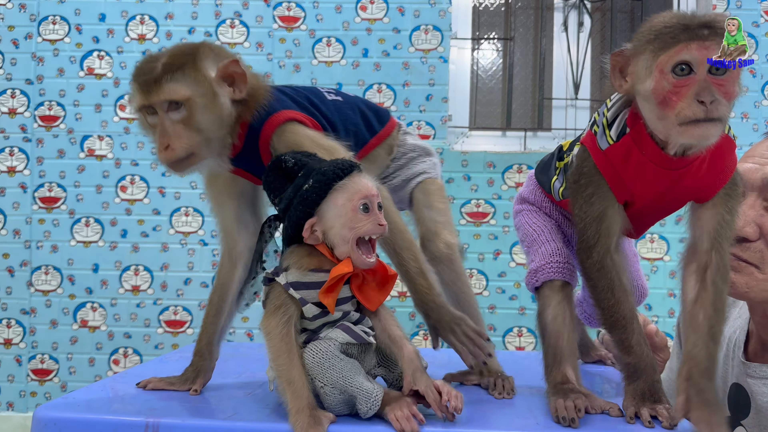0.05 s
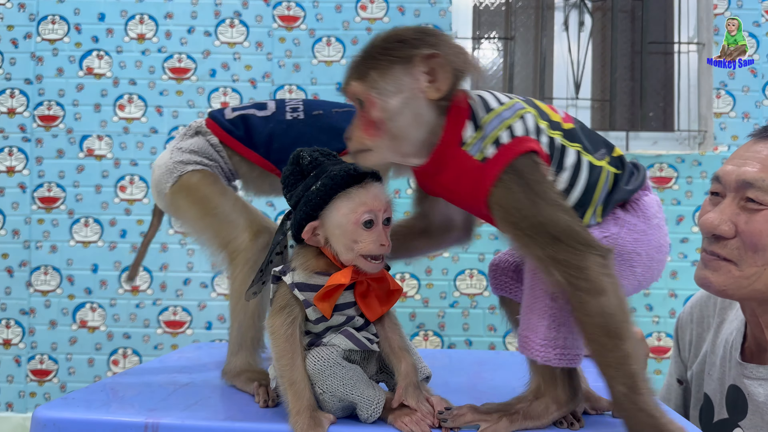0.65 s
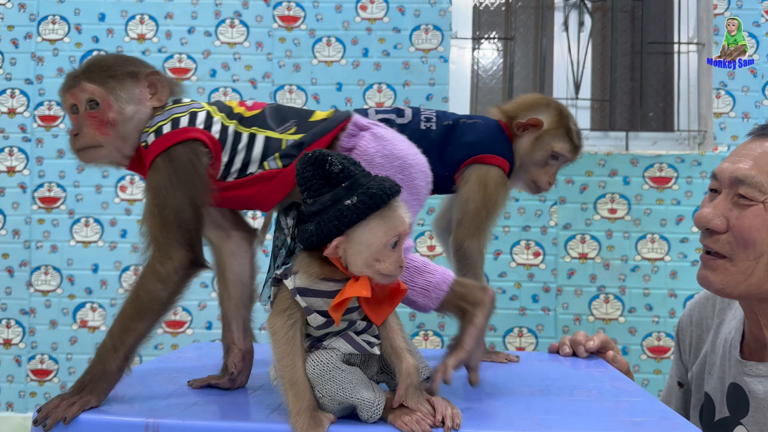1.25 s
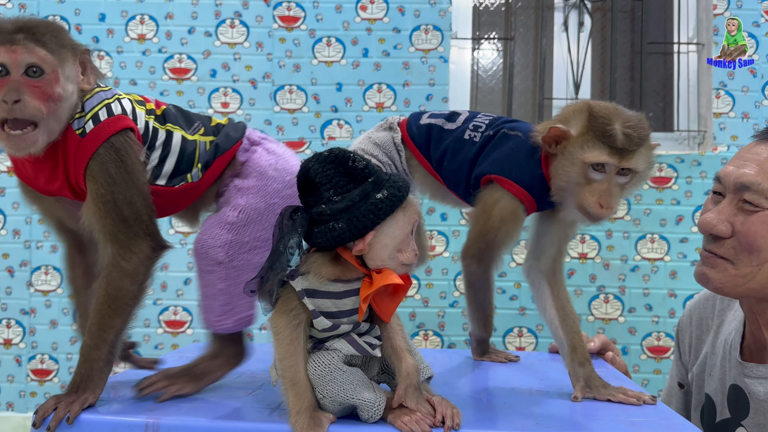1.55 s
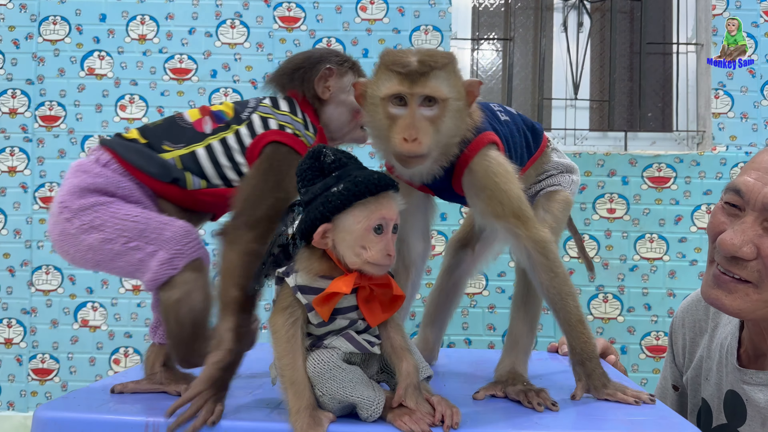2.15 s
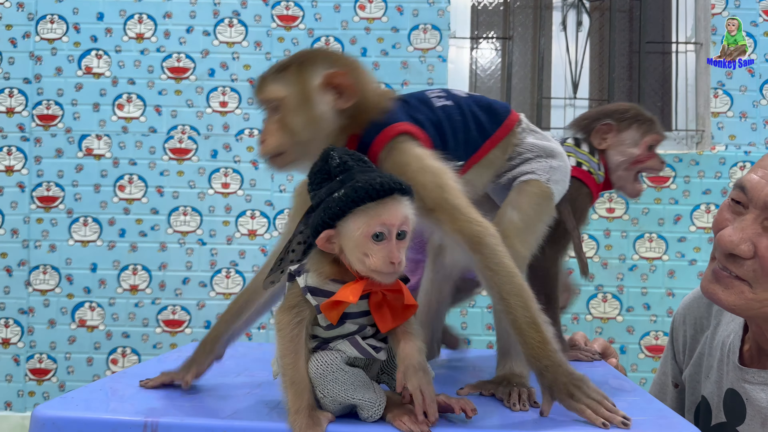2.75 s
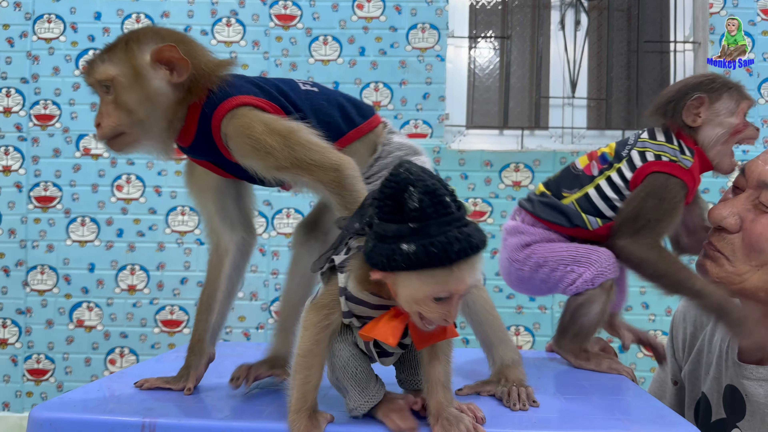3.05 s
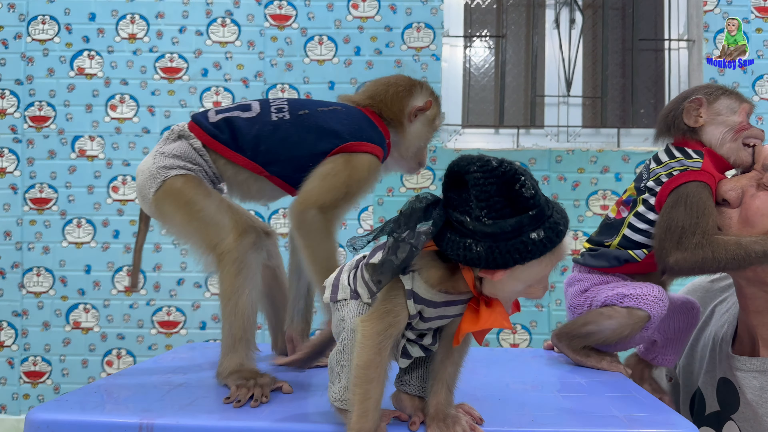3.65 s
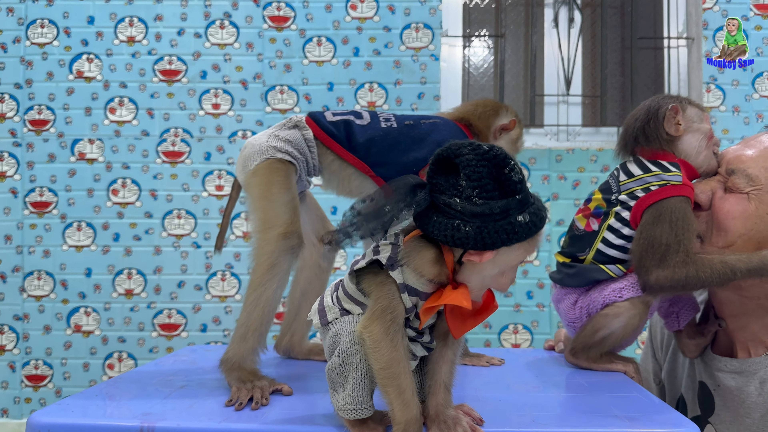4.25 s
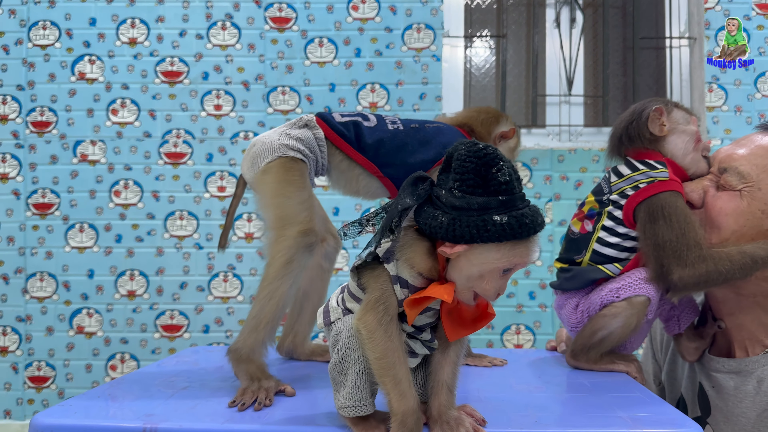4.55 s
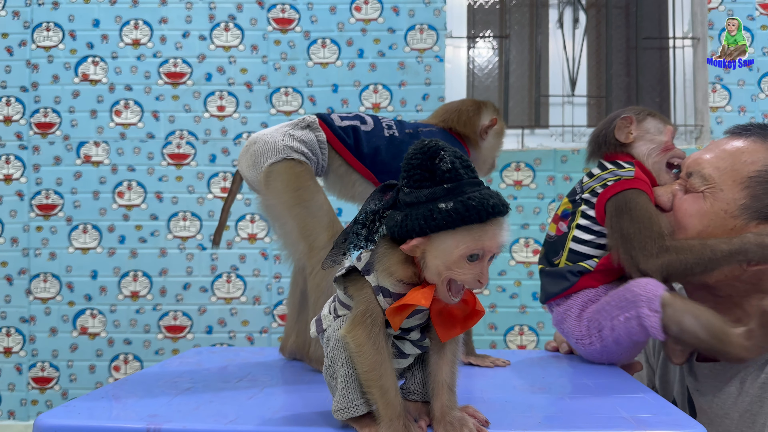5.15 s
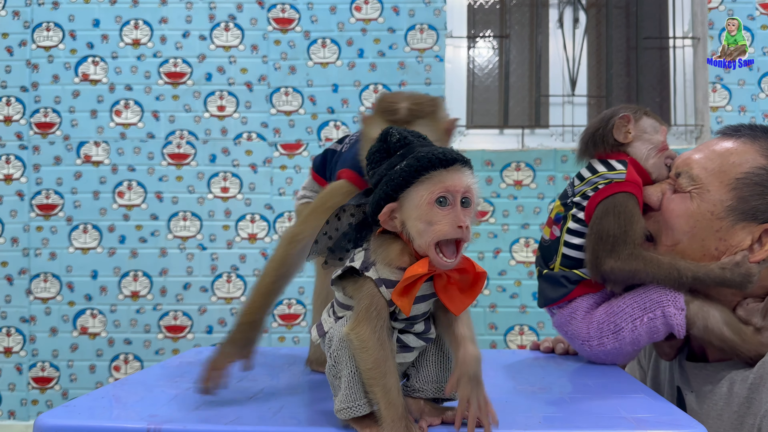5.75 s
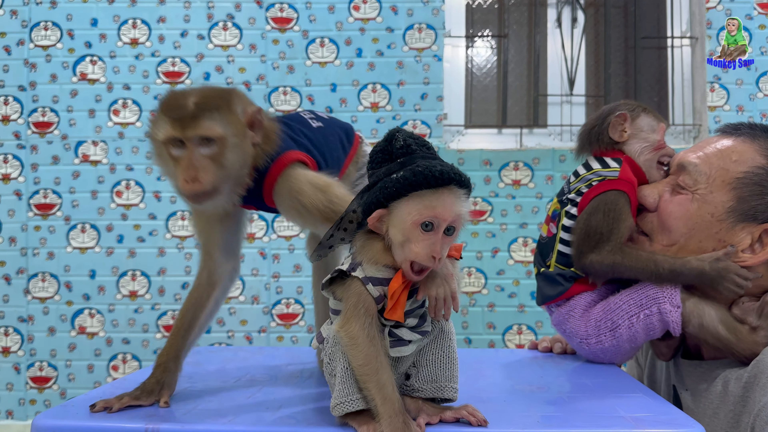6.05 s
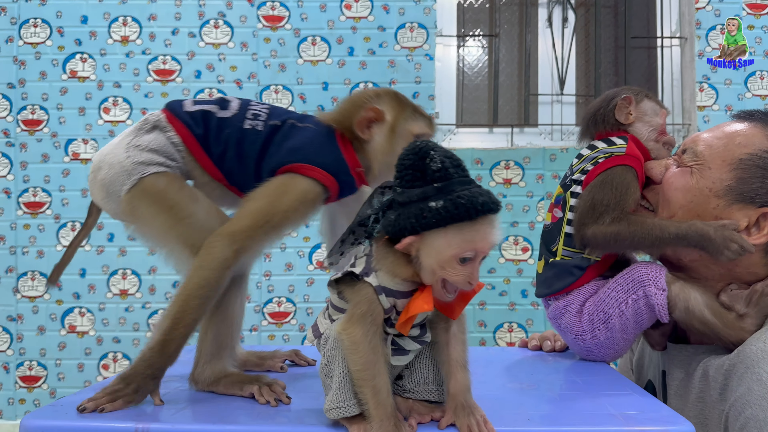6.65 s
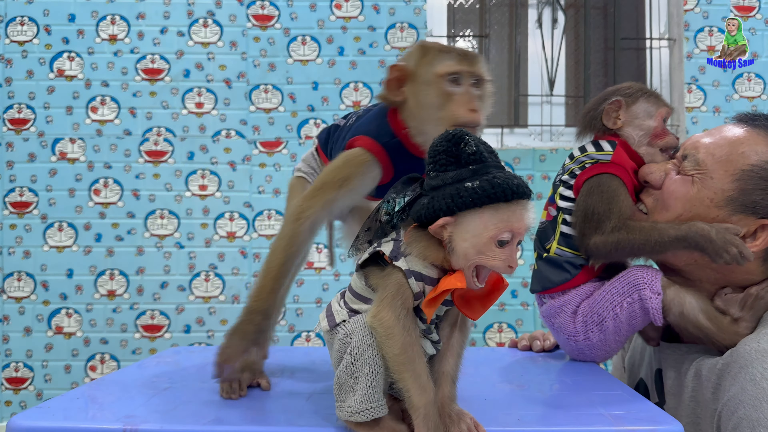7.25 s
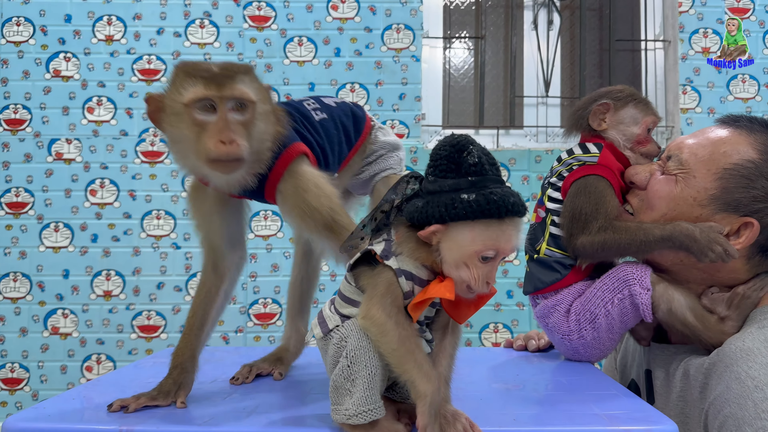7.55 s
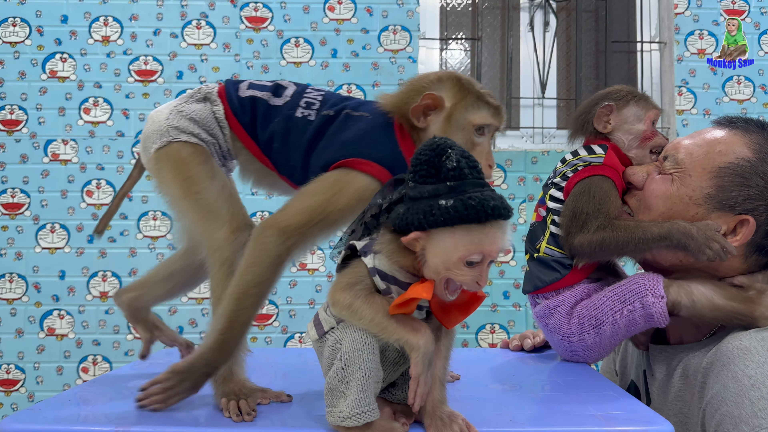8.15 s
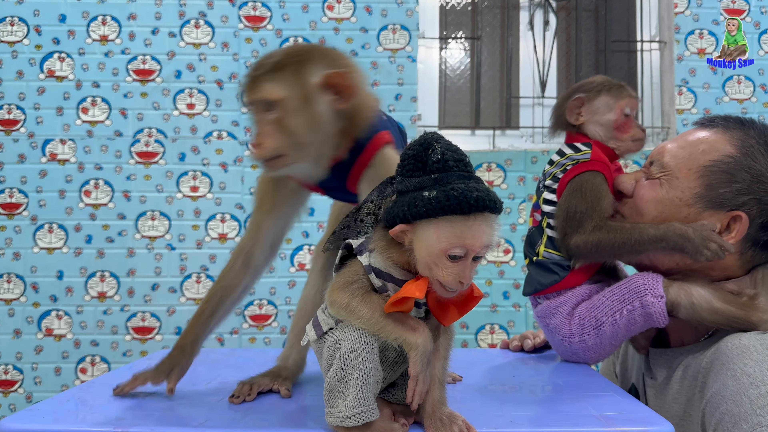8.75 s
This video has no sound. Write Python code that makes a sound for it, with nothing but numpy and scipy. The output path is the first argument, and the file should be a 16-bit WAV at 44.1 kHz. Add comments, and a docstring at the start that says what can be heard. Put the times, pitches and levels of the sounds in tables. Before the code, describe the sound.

A baby monkey screams repeatedly in an echoing room, with thin chirps, soft coos and light thumps over a faint hum.

```python
"""Baby monkey screaming in a tiled room

A baby monkey screams five times: a clear wail rises, breaks into a hoarse shriek as the vocal folds
flap chaotically, and plunges. A sixth wail is just starting at the end. Thin chirps and soft coos
come between. Older monkeys clamber over a plastic table, feet thumping, nails ticking and limbs
scuffing, while a motor hums faintly under the room air."""
import sys
import numpy as np
from scipy import signal
from scipy.fft import rfft, irfft
from scipy.io import wavfile

SR = 44100
rng = np.random.default_rng(int(sys.argv[2]) if len(sys.argv) > 2 else 0)


def master(y):
    """Save y as 16-bit WAV."""
    cut = np.clip(np.atleast_2d(y).T, -1, 1)
    pcm = np.round(cut * 32767)  # scale
    wavfile.write(sys.argv[1], SR, pcm.astype(np.int16))


N = 397341
TIME = np.arange(N) / SR


def amp(db):
    """Decibels to gain."""
    return 10 ** (np.asarray(db) / 20)


def unit(x):
    """Scales to rms 1."""
    return x / np.sqrt(np.mean(x ** 2) + 1e-20)


def curve_at(points, hz):
    """Reads a curve on a log-frequency axis."""
    freqs, values = np.transpose(points)
    return np.interp(np.log(hz + 1), np.log(freqs + 1), values)


def noise(eq):
    """Noise of rms 1, coloured by an EQ curve in dB."""
    gain = amp(curve_at(eq, np.fft.rfftfreq(N, 1 / SR)))
    return unit(irfft(rfft(rng.standard_normal(N)) * gain, N))


def wander(hz):
    """Random motion of rms 1, no faster than about hz."""
    freqs = np.fft.rfftfreq(N, 1 / SR)
    return unit(irfft(rfft(rng.standard_normal(N)) / np.sqrt(1 + (freqs / hz) ** 4), N))


def automation(calls, fade_s=.0077):
    """Joins breakpoints (time_s, pitch_hz, level_db, ...) into curves; gain closes between calls."""
    rows = np.concatenate(calls)
    times, *columns = rows[np.argsort(rows[:, 0])].T
    hz, db, *rest = (np.interp(TIME, times, column) for column in columns)
    gate = sum(np.clip(np.minimum(TIME - call[0][0], call[-1][0] - TIME) / fade_s + .5, 0, 1)
               for call in calls)
    return hz, amp(db) * gate, *rest


def harmonics(hz, levels_db):
    """Harmonics on a moving pitch, each fading out before it leaves the audible range."""
    phase = 2 * np.pi * np.cumsum(hz) / SR
    return np.sqrt(2) * sum(amp(db) * np.clip((SR / 2 - k * hz) / (SR / 20), 0, 1) * np.sin(k * phase)
                            for k, db in enumerate(levels_db, 1))


# Decay of the tiled room: freq_hz, t60_s
ROOM_DECAY = [(150, 0.48), (1000, 1), (3000, 0.77), (6000, 0.42), (10000, 0.48), (15000, 0.38)]
def room(x, wet_db, early_db=-7, shared=.1, echoes_per_s=6000, build_s=.0084):
    """Direct sound, a few wall reflections and a dense tail in which each band dies at its own speed."""
    taps = rng.standard_normal((3, SR)) * (rng.random((3, SR)) < echoes_per_s / SR)
    stereo_taps = np.sqrt(shared) * taps[0] + np.sqrt(1 - shared) * taps[1:]
    hz, age, bands = signal.stft(stereo_taps, SR, nperseg=256)
    decay = amp(-60 * age / curve_at(ROOM_DECAY, hz)[:, None])
    tail = signal.istft(bands * decay * np.clip(age / build_s, 0, 1), SR, nperseg=256)[1]
    response = amp(wet_db) * tail / np.linalg.norm(tail[0])
    for ear in response:
        delays = (rng.uniform(.002, .02, size=6) * SR).astype(int)
        ear[delays] += amp(early_db) / np.sqrt(6) * rng.choice([-1, 1], size=6)
    response[:, 0] += 1  # direct sound
    return signal.fftconvolve(x[None], response / np.linalg.norm(response[0]), axes=1)[:, :N]


# Colour of the room tone: freq_hz, gain_db
AIR_EQ = [(25, -39), (55, -9), (130, -8), (200, -7.5), (330, -11.5), (1350, -15.5), (2240, -19.5),
          (4500, -32), (10000, -39), (15000, -47)]
def room_air(level_db=-47, shared=.18):
    """A wide, gently drifting rush of air."""
    common, left, right = (noise(AIR_EQ) for _ in range(3))
    air = np.sqrt(shared) * common + np.sqrt(1 - shared) * np.array([left, right])
    return air * amp(level_db + 1.2 * wander(1.3))


# Swells of the motor's hum, early and late: time_s, level_db
HUM_RIDE_EARLY = [(0.0, -54), (1.03, -56), (1.94, -44), (2.34, -57), (2.8, -52)]
HUM_RIDE_LATE = [(3.8, -67), (4.64, -60), (5.46, -44), (5.62, -58), (6.71, -42), (7.7, -57), (8.9, -40),
                 (9.0, -44)]
def motor(fast_hz=107, slow_hz=92.6, slowing_s=(2.1, 5.3), whine_hz=312, whine_db=-60, trim_db=1):
    """A drifting hum that drops in pitch once as the motor slows, and a faint whine."""
    times, levels_db = np.concatenate([HUM_RIDE_EARLY, HUM_RIDE_LATE]).T
    hz = np.interp(TIME, slowing_s, [fast_hz, slow_hz])
    gain = amp(trim_db + np.interp(TIME, times, levels_db) + 2.8 * wander(7))
    hum = gain * harmonics(hz * (1 + .02 * wander(15)), [0, -18])
    whine = amp(whine_db + 2.7 * wander(2.5)) * harmonics(whine_hz * (1 + .0025 * wander(4.3)), [0])
    return hum + whine


def bursts(contacts, eq, attack_s):
    """Coloured noise that swells and dies after each contact (start_s, level_db, t60_s)."""
    envelope = np.zeros(N)
    for start, db, t60 in contacts:
        first = int(start * SR)
        age = TIME[:min(SR, N - first)]
        envelope[first:first + SR] += amp(db - 60 * age / t60) * (1 - np.exp(-age / attack_s))
    return envelope * noise(eq)


# Footfalls, nail ticks and light knocks: start_s, level_db
FOOTFALLS = [(2.924, -29), (3.029, -31.5), (3.107, -29), (3.248, -34), (3.328, -35.5), (3.415, -31.5),
             (8.7, -40), (8.87, -38)]
NAIL_TICKS = [(1.5916, -32.5), (1.6053, -30), (1.6243, -20.5), (1.6555, -26.5), (5.062, -30)]
TABLE_KNOCKS = [(4.408, -30), (4.609, -30), (8.706, -34), (8.786, -33)]
# Limbs scuffing: start_s, level_db, t60_s
LIMB_SCUFFS = [(1.173, -47, .7), (1.62, -46, 0.43), (6.4, -36, 1)]
# Colour of each kind of contact: freq_hz, gain_db
FOOTFALL_EQ = [(25, -28.5), (60, -2.5), (110, 0), (290, -13), (600, -36.5), (1300, -76)]
KNOCK_EQ = [(300, -8), (1200, 0), (2200, -4), (5000, -20), (12000, -35)]
SCUFF_EQ = [(300, 6), (700, -0.5), (1250, 12), (1800, -3.5), (4000, -46.5), (12000, -57)]
def clambering(thump_t60_s=.38, tick_t60_s=.032, knock_t60_s=.06):
    """Feet, nails and limbs strike and rub the plastic table."""
    tick_eq = [(500, -2), (3000, -8), (7000, -4), (15000, -7)]
    thumps = bursts([(s, db - 2.5, thump_t60_s) for s, db in FOOTFALLS], FOOTFALL_EQ, attack_s=.002)
    ticks = bursts([(s, db - 5, tick_t60_s) for s, db in NAIL_TICKS], tick_eq, attack_s=.0001)
    knocks = bursts([(s, db - 8, knock_t60_s) for s, db in TABLE_KNOCKS], KNOCK_EQ, attack_s=.0004)
    return thumps + ticks + knocks + bursts(LIMB_SCUFFS, SCUFF_EQ, attack_s=.004)


# Soft hoots and squeaks: start_s, end_s, start_hz, end_hz, level_db, octave_db
HOOTS = [(1.173, 1.27, 1350, 1240, -49, -22), (1.531, 1.62, 1682, 1960, -44.5, -16),
         (1.648, 1.675, 3015, 3420, -44.5, -20), (2.14, 2.238, 770, 860, -50, 4.5),
         (2.239, 2.52, 517, 384, -42.5, -4)]
# Low throat groans around the screams' plunges: start_s, end_s, level_db
THROAT_GROANS = [(.49, .55, -49), (3.556, 3.598, -39), (5.58, 5.63, -44), (5.675, 5.707, -40),
                 (7.22, 7.256, -41), (8.508, 8.575, -42)]
def coos(groan_hz=(720, 455), groan_octave_db=-9, first_half_glide=.7):
    """Soft hoots and groans with few overtones; the higher they are, the more they crack."""
    groans = [(start, end, *groan_hz, db, groan_octave_db) for start, end, db in THROAT_GROANS]
    calls = [[(start, first_hz, db - 5.5, octave),
              ((start + end) / 2, first_hz + first_half_glide * (last_hz - first_hz), db, octave),
              (end, last_hz, db - 1, octave)]
             for start, end, first_hz, last_hz, db, octave in HOOTS + groans]
    hz, gain, octave_db = automation(calls, fade_s=.0052)
    jitter = np.interp(hz, [600, 1500], [.013, .042])
    return gain * harmonics(hz * (1 + jitter * wander(130)), [0, octave_db, -24, -22])


# One long sagging whistle: time_s, pitch_hz, level_db
LONG_WHISTLE = [(2.309, 5300, -41), (2.38, 6470, -36), (2.458, 5458, -31), (2.612, 5230, -28),
                (2.639, 4420, -33.5)]
# Short chirps: start_s, flick_s, held_hz, lift_ratio, held_db, flick_db, rasp_db
CHIRP_CALLS = [(1.744, 1.85, 6157, .02, -24, -32, -26), (2.775, 2.827, 5430, .15, -23, -32, -9.5),
               (2.966, 3.013, 5850, .17, -26.5, -22, -5), (3.345, 3.386, 5745, .24, -27, -23.5, -5),
               (3.673, 3.712, 5460, .2, -20, -18.5, -9), (3.85, 3.9, 6595, .1, -24.5, -24, -7),
               (4.04, 4.089, 5820, .2, -26, -23, -8), (4.249, 4.295, 5570, .19, -24.5, -21, -11),
               (4.465, 4.507, 6450, .02, -27.5, -24, -14), (6.055, 6.171, 5500, .19, -22, -11, -20),
               (6.265, 6.283, 5250, .19, -27, -16.5, -12), (6.392, 6.405, 4980, .21, -37, -15.5, -15.5),
               (6.543, 6.567, 5900, .07, -22.5, -31, -16), (7.615, 7.635, 6400, .05, -51, -55, -10)]
def chirps(fall_s=.018, jitter=.003, flick_jitter=.042, warble=.017, octave_db=-10, onset_db=-8):
    """Thin, breathy, warbling whistles; the short ones lift, settle, flick up raggedly and drop fast."""
    calls = [[(*row, jitter, -5.5, octave_db) for row in LONG_WHISTLE]]  # rasp 5.5 dB under the tone
    for start, flick, held_hz, lift, held_db, flick_db, rasp_db in CHIRP_CALLS:
        top_hz, length = held_hz * (1 + lift), flick - start
        end_hz = top_hz * (.67 - .01 * (flick_db + 24))  # louder flicks drop deeper
        hold = [(start, held_hz, held_db + onset_db),
                (start + .13 * length, top_hz, held_db + onset_db / 3),
                (start + .28 * length, held_hz, held_db),
                (flick - .005, held_hz, held_db)]
        drop = [(flick, top_hz, flick_db - 7),
                (flick + fall_s / 2, (top_hz + end_hz) / 2, flick_db),
                (flick + fall_s, end_hz, flick_db)]
        calls.append([(*row, jitter, rasp_db, octave_db) for row in hold]
                     + [(*row, flick_jitter, rasp_db - 16, octave_db - 9) for row in drop])
    hz, gain, rough, rasp_db, overtone_db = automation(calls)
    rough = rough + .028 * amp(rasp_db)  # the breathier the call, the less steady its tone
    hz = hz * (1 + rough * wander(600) + warble * wander(40))
    tone = harmonics(hz, [0, overtone_db + 5 * wander(60)])
    rasp = amp(rasp_db) * noise([(1000, -12), (4000, -5), (11500, 1), (15000, -3.5)])
    return gain * amp(-.8 + 2 * wander(120)) * (tone + rasp)


def wail_shape(start, length, first_hz, middle_hz, last_hz, onset_db, full_db, full_at):
    """Breakpoints of a wail: it starts sharp, settles, swells and bends up toward the break."""
    progress = np.linspace(0, 1, 60)
    glide_hz = np.polyval(np.polyfit([0, .5, 1], [first_hz, middle_hz, last_hz], 2), progress)
    scoop_hz = 45 * np.exp(-progress * length / .035)
    bend_hz = 350 * np.exp((progress - 1) * length / .03)
    db = np.interp(progress, [0, full_at, 1], [onset_db, full_db, full_db - 3.5])
    return np.transpose([start + progress * length, glide_hz + scoop_hz + bend_hz, db])


# The throat's colour, relative to a wail's octave: freq_hz, gain_db
THROAT_EQ = [(1300, -14), (2000, -13), (3900, -22.5), (5000, -4.5), (5800, -17.5), (7000, -28.5),
             (10000, -33), (15000, -34)]
# Opening wails: start_s, length_s, first_hz, middle_hz, last_hz, onset_db, full_db, full_at_fraction
WAIL_CALLS = [(0, .32, 1490, 1818, 1748, -22, -21, .3), (2.99, .2, 1235, 1430, 1652, -28.5, -17.5, .68),
              (5.01, .295, 1292, 1510, 1817, -29, -17, .52),
              (6.585, .395, 1265, 1509, 1720, -24, -17.5, .55),
              (7.87, .48, 1358, 1586, 1850, -27, -17, .45), (8.971, .3, 1410, 1550, 1750, -30, -19, .5)]
def wails(jitter=.0045, strain=.02, break_hz=1950, waver=.0035, swell_db=4, easy_db=-20, trim_db=-2.5):
    """A clear voice with a strong octave; effort brightens it, and it frays as it nears its break."""
    hz, gain = automation([wail_shape(*row) for row in WAIL_CALLS])
    rough = jitter + strain * np.minimum(hz / break_hz, 1.1) ** 14
    bright_db = .5 * (20 * np.log10(gain + 1e-9) - easy_db)
    # the weaker harmonics slide through the throat's resonances, and swell and fade as the mouth moves
    levels_db = [0 if k == 2 else
                 curve_at(THROAT_EQ, k * hz) + (bright_db + swell_db * wander(9.8)) * (k > 1)
                 for k in range(1, 11)]
    hz = hz * (1 + rough * wander(690) + waver * wander(35))
    return gain * amp(trim_db + wander(42)) * harmonics(hz, levels_db)


ROUGH_BREAK, ROUGH_CLIMB, ROUGH_HOLD, ROUGH_PLUNGE = .55, 1.15, .85, .72  # 0 clean, 1 hoarse


def yelp_shape(start, end, db, top_hz=10600, end_hz=2750):
    """Breakpoints of a yelp: it starts at the top and falls ever faster as it swells."""
    progress = np.linspace(0, 1, 20)
    hz = top_hz + (end_hz - top_hz) * progress ** 3
    swell_db = np.interp(progress, [0, .6], [-14, 0])
    rough = np.full_like(progress, ROUGH_PLUNGE)
    return np.transpose([start + progress * (end - start), hz, db + swell_db, rough])


# Ragged, whistling and thinning stages of a shriek's climb: time_fraction, rise_fraction
SHRIEK_STAGES = [(.3, .2), (.48, .51), (.73, .71)]
def shriek_shape(start, climb, end, plunge, top_hz, end_hz, climb_db, hold_db, plunge_db, whistle,
                 break_hz=2030, thin_db=-3.5, whistle_db=6.5):
    """Breakpoints of a shriek: a ragged climb, a hoarse swelling hold, a loud plunge."""
    # halfway up, the folds may lock into a louder, clean whistle
    rough_locked = ROUGH_CLIMB * (1 - .9 * whistle)
    ragged, locks, thins = SHRIEK_STAGES
    stages = [((0, 0), climb_db + thin_db, ROUGH_BREAK),
              (ragged, climb_db, ROUGH_CLIMB),
              (locks, climb_db + whistle_db * whistle, rough_locked),
              (thins, climb_db + thin_db, rough_locked),
              ((1, 1), hold_db, ROUGH_HOLD)]
    rising = [(start + progress * climb, break_hz + (top_hz - break_hz) * rise, db, rough)
              for (progress, rise), db, rough in stages]
    falling = [(end - plunge, .95 * top_hz, hold_db + 3, ROUGH_HOLD),
               (end - plunge / 2, (top_hz + end_hz) / 2, plunge_db, ROUGH_PLUNGE),
               (end, end_hz, plunge_db - 1.5, ROUGH_PLUNGE)]
    return rising + falling


# Short yelps thrown after a shriek: start_s, end_s, level_db
YELP_CALLS = [(5.642, 5.702, -14), (7.192, 7.248, -15.5)]
# Shrieks breaking out of the wails:
# start_s, climb_s, end_s, plunge_s, top_hz, end_hz, climb_db, hold_db, plunge_db, whistle_amount
SHRIEK_CALLS = [(.27, .225, .533, .033, 7000, 5300, -33, -32.5, -21.5, 0),
                (3.18, .15, 3.556, .086, 11200, 4240, -28, -23, -17.5, .9),
                (5.295, .155, 5.63, .07, 11100, 5600, -21.5, -21, -14, .9),
                (6.975, .11, 7.18, .05, 10700, 6800, -27, -26, -17, .8),
                (8.33, .135, 8.567, .08, 11000, 3100, -28, -25, -19, .1)]
def shrieks(chaos=.12, lurch=.075, flutter_db=5, octave_db=-12, rasp_db=-5, bright_hz=9000, trim_db=-.7):
    """The folds whistle; chaotic flapping smears the tone and adds a rasp that brightens with pitch."""
    calls = [shriek_shape(*row) for row in SHRIEK_CALLS] + [yelp_shape(*row) for row in YELP_CALLS]
    hz, gain, rough = automation(calls)
    smear = rough ** 1.5 * (chaos * wander(1000) + lurch * wander(130.6))
    tone = harmonics(hz * (1 + smear), [0, octave_db])
    dull = noise([(700, -27.5), (1800, -9.5), (3500, -5.5), (6000, -2), (15000, -13.5)])
    sharp = noise([(1500, -19), (3200, -14), (9500, -7), (13000, -5)])
    tension = np.minimum(hz / bright_hz, 1) ** 2
    rasp = amp(rasp_db) * np.sqrt(rough) * ((1 - tension) * dull + tension ** 1.5 * sharp)
    return gain * amp(trim_db + flutter_db * rough * np.tanh(wander(300))) * (tone + rasp)


def scene():
    """Screams, chirps and table noises ring in the room, chirps wettest, over a bed of motor and air."""
    baby = room(wails(), wet_db=-1.5) + room(shrieks(), wet_db=-1.5)
    older = room(chirps(), wet_db=1.5) * amp([[.7], [-.7]])  # slightly left
    coos_and_table = room(coos() + clambering(), wet_db=-2.5)
    bed = (motor() + room_air()) * amp([[1], [-1]])  # slightly left
    return amp(2.5) * (baby + older + coos_and_table) + bed


# Stereo image, treble shared by both channels with a turning phase: freq_hz, likeness_amount, phase_rad
STEREO_IMAGE = [(100, 0, 1.1), (300, 0, .6), (3890, 0, 0.5), (6800, 0, 1.5), (7900, 0, -0.34),
                (10210, .96, -2.04), (10830, 1, -3), (11600, 1, -2.5), (14140, 1, -6.5)]
def record(dry, cutoff_hz=15650):
    """In the treble both channels carry one sound with a turning phase; a low-pass trims the top."""
    hz = np.fft.rfftfreq(N, 1 / SR)
    freqs, *columns = np.transpose(STEREO_IMAGE)
    likeness, phase = (np.interp(hz, freqs, column) for column in columns)
    apart = np.sqrt(1 - likeness ** 2)
    left, right = rfft(dry)
    right = (likeness * left + apart * right) / np.sqrt(1 + likeness * apart)
    pair = irfft([left, right * np.exp(-1j * phase)], N)
    lowpass = signal.firwin(511, cutoff_hz, window=("kaiser", 9), fs=SR)
    return signal.oaconvolve(pair, lowpass[None], "same")


dry = scene()
out = record(dry)
master(out)
```